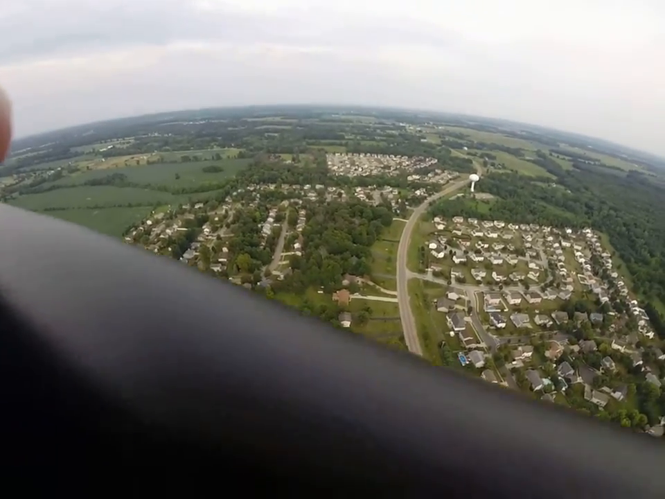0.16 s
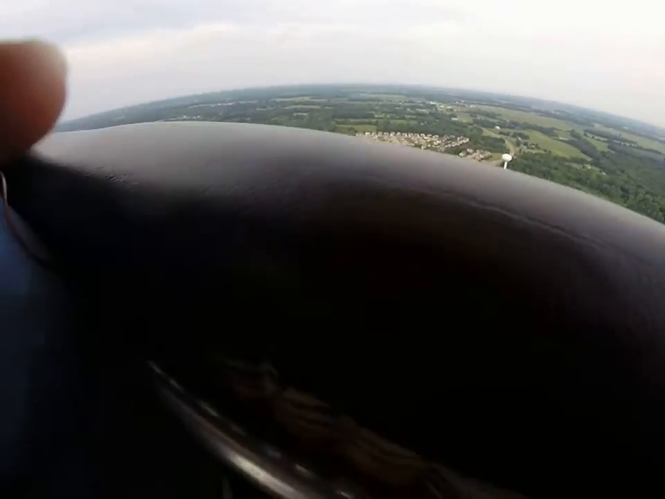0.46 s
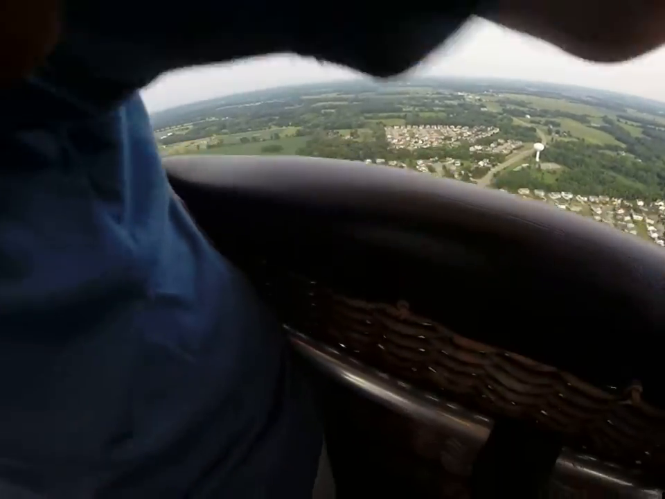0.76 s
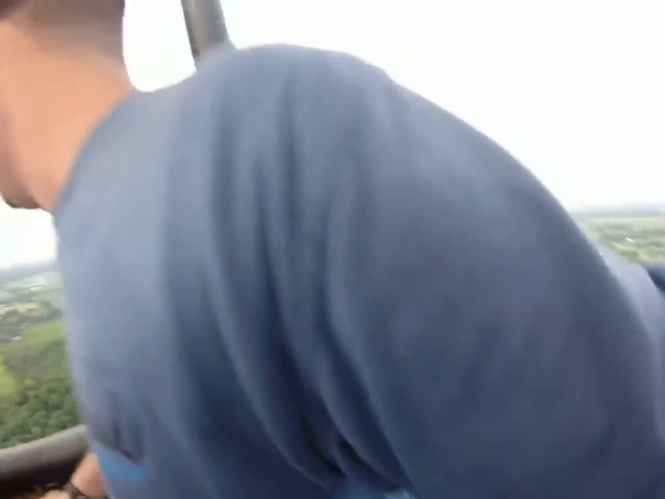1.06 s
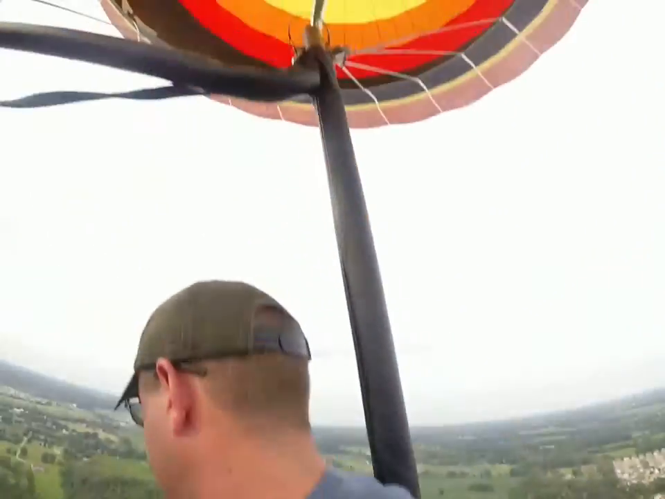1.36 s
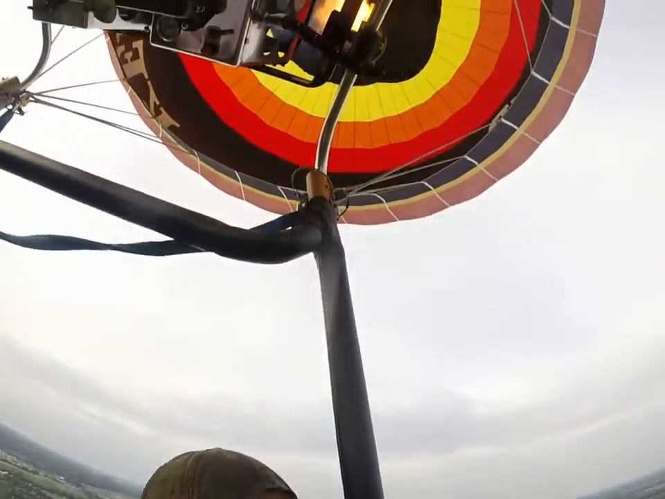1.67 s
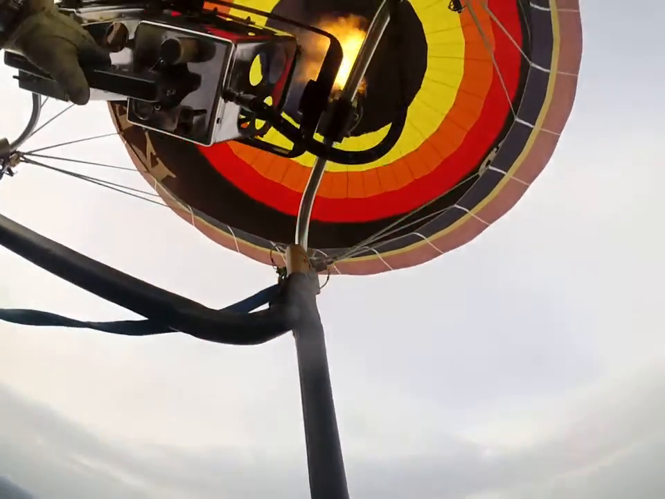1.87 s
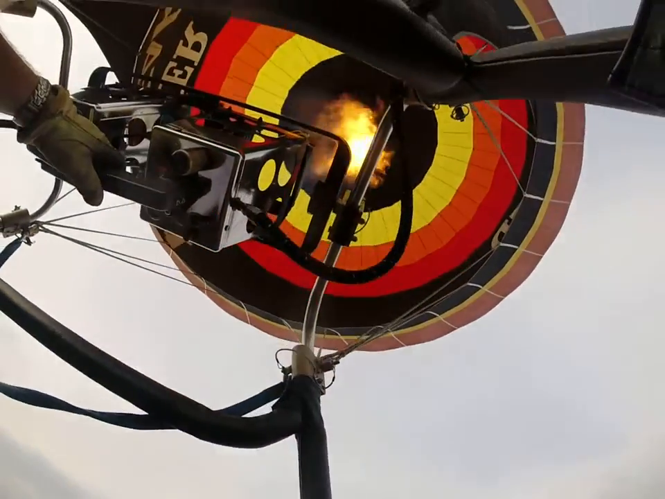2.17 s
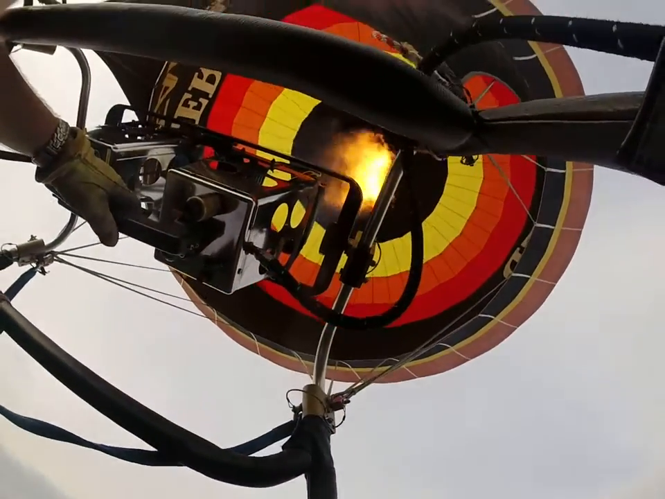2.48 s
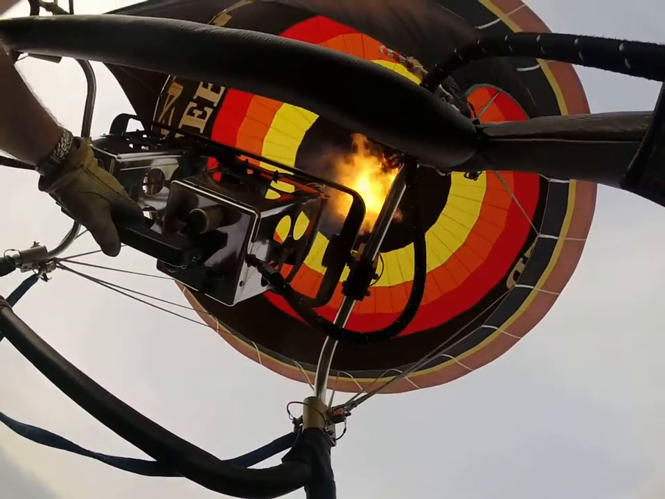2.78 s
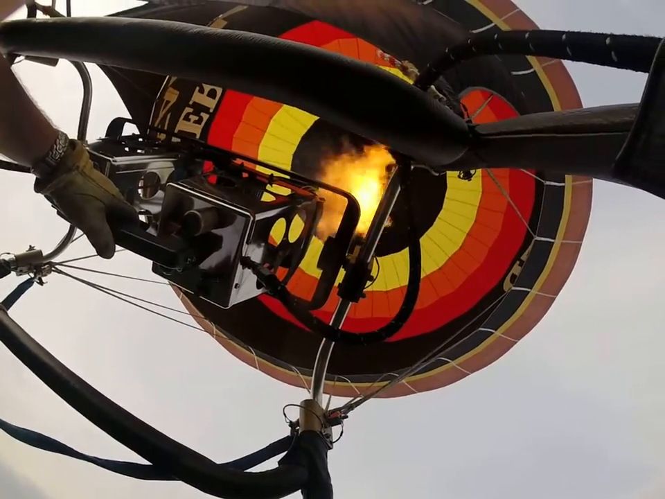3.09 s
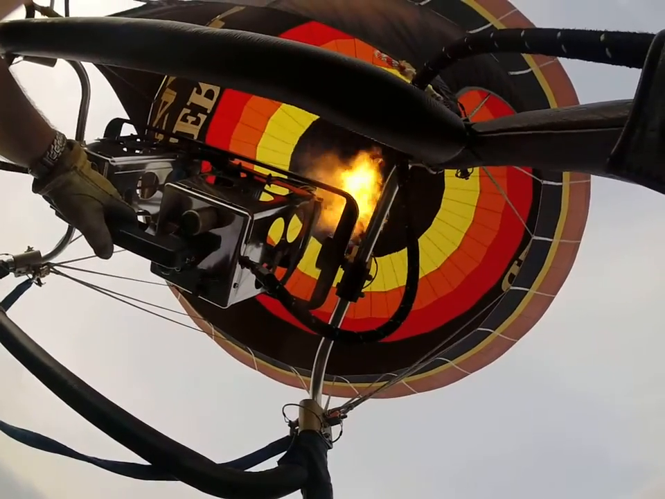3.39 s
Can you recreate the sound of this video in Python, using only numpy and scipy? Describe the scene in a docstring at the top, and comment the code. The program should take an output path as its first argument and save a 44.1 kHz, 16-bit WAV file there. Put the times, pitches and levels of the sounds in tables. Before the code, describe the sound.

A hot air balloon burner roars and hisses, growing brighter, with plastic knocks early on

```python
"""A hot air balloon burner fires above an open basket: a low flame roar under the hiss of the gas jets.
A hand-held camera in its case swings from the rim round to face the burner, so the hiss grows and brightens;
fingers knock the case a few times on the way. Just after 1.1 s the hiss and the roar drop abruptly.
Hiss and roar are noise shaped by moving spectra; knocks are short, fading tones. One microphone."""
import sys
import numpy as np
from scipy import signal
from scipy.io import wavfile
from scipy.ndimage import uniform_filter1d

SR = 44100
rng = np.random.default_rng(int(sys.argv[2]) if len(sys.argv) > 2 else 0)


def level_to_linear(level):
    """Convert decibel levels to linear amplitude factors, elementwise."""
    exponent = np.asarray(level, float) / 20
    return 10 ** exponent


def put_to_file(sound):
    """Save the sound as 16-bit audio at rate SR, in the file named by the first command-line argument."""
    columns = np.atleast_2d(sound).T  # one column per channel
    safe = np.clip(columns, -1, 1)
    whole_steps = np.round(safe * 32767)
    wavfile.write(sys.argv[1], SR, whole_steps.astype(np.int16))


N = 156114  # length in samples


def evened(x):
    """Scales to an rms (average strength) of 1."""
    return x / np.sqrt(np.mean(x ** 2) + 1e-20)


def read_spectrum(points, hz):
    """Reads levels between table points on a log frequency axis; -100 dB beyond its ends."""
    table_hz, level_db = np.transpose(points)
    return np.interp(np.log(hz + 1), np.log(table_hz + 1), level_db, -100, -100)


def soft_switch(hz, corner_hz):
    """Goes smoothly from 0 below the corner to 1 above."""
    return 1 / (1 + (corner_hz / (hz + 1)) ** 8)


def bump(hz, centre_hz, width_hz):
    """Bell shape of height 1."""
    return np.exp(-.5 * ((hz - centre_hz) / width_hz) ** 2)


def turbulence(shape, size, patchy_db, flicker_db, patch_hz, patch_s):
    """Churning gas: random short-time spectra under shape(hz, t), patchy and flickering; overall rms 1."""
    hop = size // 4
    frames = N // hop + 5
    hz = np.fft.rfftfreq(size, 1 / SR)[:, None]
    real, imaginary, patches = rng.standard_normal((frames, len(hz), 3)).T

    # smooth the random patches over frequency and time; the flicker is shared by all frequencies
    bins = max(round(patch_hz * size / SR), 1)
    steps = max(round(patch_s * SR / hop), 1)
    flicker = evened(uniform_filter1d(rng.standard_normal(frames), steps))
    patches = uniform_filter1d(patches, bins, 0)
    patches = evened(uniform_filter1d(patches, steps, 1))

    gain = shape(hz, np.arange(frames) * hop / SR)
    gain = gain / np.linalg.norm(gain, axis=0)  # equal strength in every frame
    gain = gain * level_to_linear(patchy_db * patches + flicker_db * flicker)
    noise = signal.istft((real + 1j * imaginary) * gain, nperseg=size, noverlap=size - hop)[1]
    return evened(noise[:N])


def hiss():
    """Gas jets: noise whose colour turns with the camera; sound bouncing in a narrow gap combs it."""
    # hiss at the microphone as the camera swings: (time [s], level [dB], facing the burner [0-1],
    # close reflection [0-1], its delay [ms], treble lift [dB], first hollow band lift [dB],
    # second hollow band lift [dB], main peak [Hz])
    swing = [(0, -26.5, 0.02, 0.45, 0.96, 4, 1.5, 0.1, 4200), (.2, -27, 0.12, 0.21, .93, 0.1, 8, 5.5, 4130),
             (.4, -27.5, 0.16, 0.37, 0.96, -2.5, 0.1, -3, 4230), (.55, -27, 0.19, 0.1, 1, 1, -1, 1.5, 4520),
             (.7, -24.5, 0.31, 0.37, 0.89, 2.5, -0.5, 2, 4760),
             (.86, -24, 0.071, 0.28, 0.94, 8, 7.5, 6.5, 4700),
             (.92, -26, 0.16, 0.42, 0.9, 5.5, 7.5, 0, 4400),
             (1.0, -23.5, 0.37, 0.46, 0.826, 4, 4, 10.5, 4070),
             (1.099, -22, 0.38, 0.2, 0.91, 4.5, -15, 0.2, 4200),
             (1.103, -27, 0.2, 0.27, 1, 1.5, -2, -1, 4200), (1.25, -26.5, 0.41, 0.18, 0.91, 2, 4, 5, 4300),
             (1.4, -22, 0.63, 0.53, 0.95, 1, -3, 2, 4240),
             (1.6, -21.5, 0.49, 0.14, 0.97, 2.5, -3.5, 7, 4050),
             (1.9, -17.5, 0.69, 0.2, 0.92, 0, -2.5, 0.5, 4080),
             (2.1, -17, 0.7, 0.25, 0.95, 1.2, -1, -2.2, 3950),
             (2.36, -15, 0.9, 0.12, 0.83, 0, 1.5, -1.5, 4100),
             (2.7, -16, 0.86, 0.17, .92, 2.5, -1.5, -3, 3980), (3.1, -16.5, 0.86, .1, 0.8, 2, 2, 0.5, 4100),
             (3.54, -16, 0.73, .1, 0.87, 2.5, 1, 0, 4100)]
    # relative hiss spectrum, camera turned away: (frequency [Hz], level [dB])
    away_spectrum = [(350, -43), (600, -31), (900, -12.5), (1300, -6.5), (1900, -8.5), (2700, -11.5),
                     (3500, -6), (5200, -9.5), (7000, -10.5), (8500, -19), (10500, -18.5), (13000, -23),
                     (15500, -29), (17000, -60)]
    # relative hiss spectrum, camera facing the burner: (frequency [Hz], level [dB])
    facing_spectrum = [(350, -48), (600, -24), (736, -6), (798, -21.5), (1090, -12.5), (1570, -20.5),
                       (1960, -15), (2060, -10.5), (2360, -11), (2640, -16), (2900, -7.5), (3410, -7),
                       (4070, 2), (4730, 4.5), (5130, -3), (5560, -0.5), (6370, -1), (7600, -15),
                       (8360, -12), (9320, -16.5), (10500, -11.5), (12900, -19), (15400, -28.5)]
    # hollow bands of the case: (centre [Hz], width [Hz])
    hollow_bands = [(1250, 110), (2300, 200)]
    times, level_db, *colour = np.transpose(swing)

    def shape(hz, t):
        facing, echo, delay_ms, treble_db, first_db, second_db, peak_hz = (
            np.interp(t, times, column) for column in colour)
        facing = np.clip(facing, 0, 1)
        echo = np.clip(echo, 0, .8)
        db = (1 - facing) * read_spectrum(away_spectrum, hz) + facing * read_spectrum(facing_spectrum, hz)
        db = db + soft_switch(hz, 6940) * treble_db
        db = db + first_db * bump(hz, *hollow_bands[0]) + second_db * bump(hz, *hollow_bands[1])
        db = db + 4 * bump(hz, peak_hz, 225)  # main peak, 4 dB
        db = db + facing * 5 * bump(hz, 10130, 180)  # narrow high band that shows when facing the jets

        # repeated reflections make evenly spaced peaks, weaker towards the treble
        turn = np.exp(1j * (1.1 - 2 * np.pi * hz * delay_ms / 10 ** 3))
        bounced = echo * turn / (1 + (hz / 6000) ** 2)
        return level_to_linear(db) / abs(1 - bounced)

    jets = turbulence(shape, size=512, patchy_db=1.11, flicker_db=.5, patch_hz=700, patch_s=0.033)
    return jets * level_to_linear(np.interp(np.arange(N) / SR, times, level_db))


def roar():
    """Burning gas: a lumpy low rumble, made of noise with a drifting low peak."""
    # flame roar: (time [s], level [dB], upper edge lift [dB], deep part lift [dB], peak [Hz])
    flame_course = [(0, -24, 14, 7, 202), (.25, -21, 9, 5, 215), (.45, -22, 12.5, 7, 203),
                    (.6, -20.5, 9.5, 0.1, 196), (.8, -18.5, 9, -1.5, 195), (.92, -27.5, 13, 5, 170),
                    (1.0, -20, 5, -3, 180), (1.099, -22.5, 1, -5, 171), (1.103, -30.5, 14.5, 6, 169),
                    (1.3, -26, 3, -2.5, 170), (1.55, -23, -3.5, 1.5, 158), (1.8, -20, -6, 0.5, 163),
                    (2.05, -18.5, -2, 8.2, 167), (2.25, -21, -3.5, 2.5, 148), (2.5, -22.5, -4, 6.5, 137),
                    (2.8, -20.5, -3.5, 2.5, 140), (3.1, -22, -6, 4, 141), (3.3, -21, -4.5, 1.5, 151),
                    (3.54, -21, -5, 0, 149)]
    # relative roar spectrum: (frequency [Hz], level [dB])
    roar_spectrum = [(12, -45), (20, -18), (69, -8), (161, -2.5), (205, -7), (264, -7), (310, -14),
                     (346, -10.5), (393, -23), (440, -21), (567, -30.5), (634, -31), (900, -39.5),
                     (1170, -82), (1980, -120)]
    times, level_db, *colour = np.transpose(flame_course)

    def shape(hz, t):
        edge_db, deep_db, peak_hz = (np.interp(t, times, column) for column in colour)
        db = read_spectrum(roar_spectrum, hz)
        db = db + soft_switch(hz, 385) * edge_db  # above 385 Hz
        db = db + (1 - soft_switch(hz, 99)) * deep_db  # below 99 Hz
        db = db + 2.5 * bump(hz, peak_hz, 44)  # drifting peak, 2.5 dB
        return level_to_linear(db)

    flame = turbulence(shape, size=2048, patchy_db=1.4, flicker_db=-0.57, patch_hz=60, patch_s=.06)
    return flame * level_to_linear(np.interp(np.arange(N) / SR, times, level_db))


def knocks():
    """Each finger knock and its quick bounce ring the short modes (natural tones) of the plastic case."""
    # knocks on the case: (time [s], peak [dB], brightness [dB per octave], pitch factor,
    # ring time factor, thud [dB], bounce [dB])
    knock_list = [(.4485, -14, 3, 1, 1, -30, -6), (.6390, -9.5, -16, .78, 1.9, -30, -30),
                  (.6744, -5.5, 1, 1.38, 1.1, -30, -30), (.8771, 0, -1, 1.07, .85, -30, -2),
                  (1.0535, -14, -8, 1, 1, -30, -8), (1.1152, 0, -9, .96, .8, -7, -14)]
    # modes of the case before each knock alters them: (frequency [Hz], level [dB], time to fall 60 dB [s])
    case_modes = [(1300, 0, .0075), (2250, 1, .0065), (3000, -6, .005), (4300, -16, .005), (5200, -4, .006),
                  (6200, -6, .005)]
    thud_hz, thud_t60_s = 700, .005
    touch_s, bounce_s = .0001, .00105  # softness of the touch, delay of the bounce
    out = np.zeros(N)
    t = np.arange(1024) / SR
    for start_s, peak_db, bright_db, pitch, ring, thud_db, bounce_db in knock_list:
        modes = []
        for k, (hz, db, t60) in enumerate(case_modes):
            sign = (-1) ** k  # neighbouring modes start in opposite directions
            tilted_db = db + bright_db * np.log2(hz / case_modes[0][0])
            modes.append((sign * hz * pitch, tilted_db, t60 * ring))
        modes.append((thud_hz, thud_db, thud_t60_s))

        ringing = sum(level_to_linear(db - 60 * t / t60) * np.sin(2 * np.pi * hz * t) for hz, db, t60 in modes)
        tap = (1 - np.exp(-t / touch_s)) * ringing
        tap = tap - level_to_linear(bounce_db) * np.roll(tap, round(bounce_s * SR))  # the bounce is upside down
        out[round(start_s * SR):][:len(t)] += level_to_linear(peak_db) * tap / abs(tap).max()
    return out


def scene():
    """All sources reach one microphone, heard alike on both channels."""
    return np.tile(hiss() + roar() + knocks(), (2, 1))


def roll_off(x):
    """The treble ends steeply here."""
    return signal.sosfilt(signal.butter(12, 15550, fs=SR, output="sos"), x)


def record(dry):
    """Soft overload rounds off the hardest knocks, then a filter removes the top treble."""
    overload = .97  # ceiling, where full scale is 1
    limited = dry / (1 + (dry / overload) ** 8) ** (1 / 8)
    low_pass = signal.firwin(511, 15350, window=("kaiser", 9), fs=SR)
    mix = signal.oaconvolve(limited, low_pass[None], "same")
    return roll_off(mix)


dry = scene()
out = record(dry)
put_to_file(out)
```